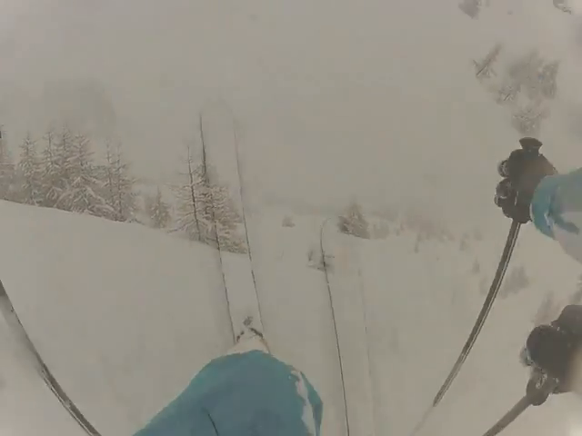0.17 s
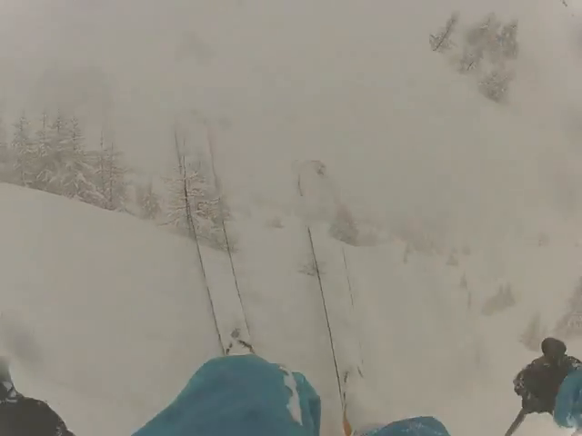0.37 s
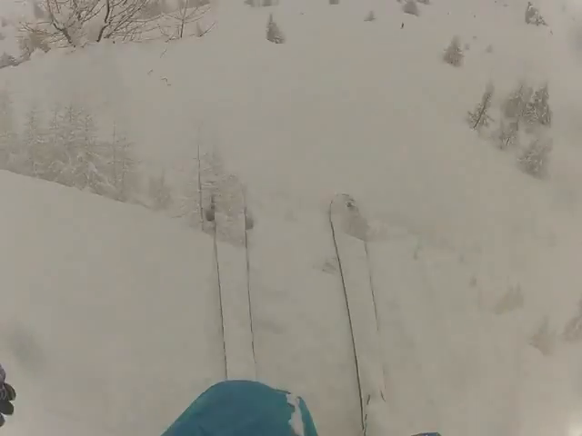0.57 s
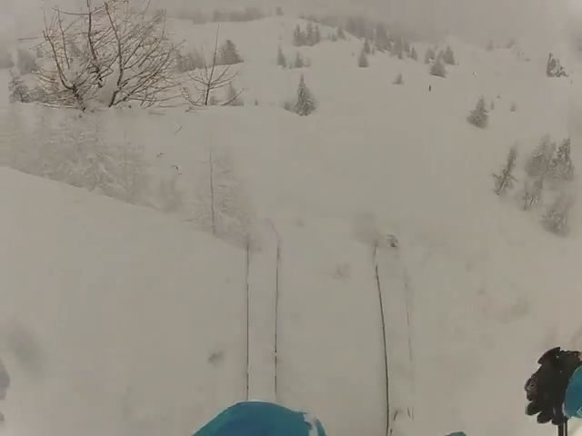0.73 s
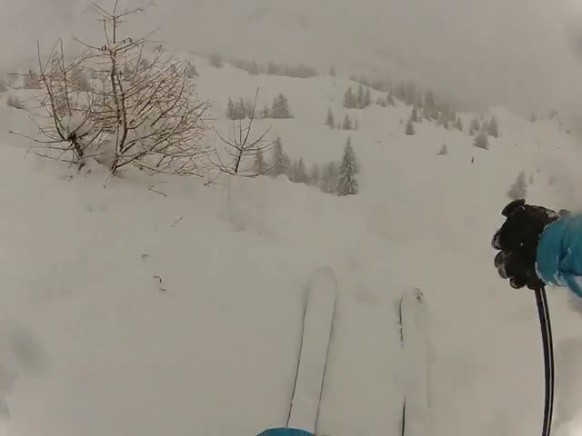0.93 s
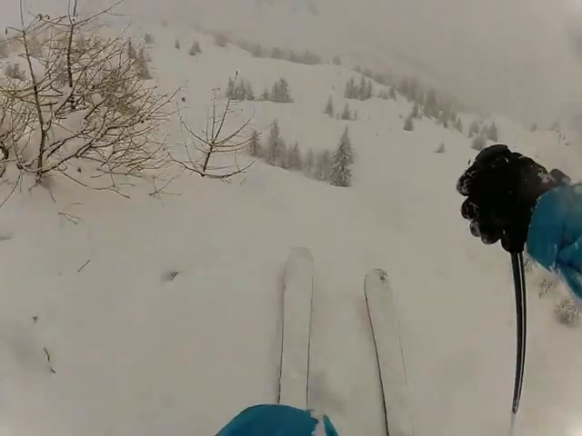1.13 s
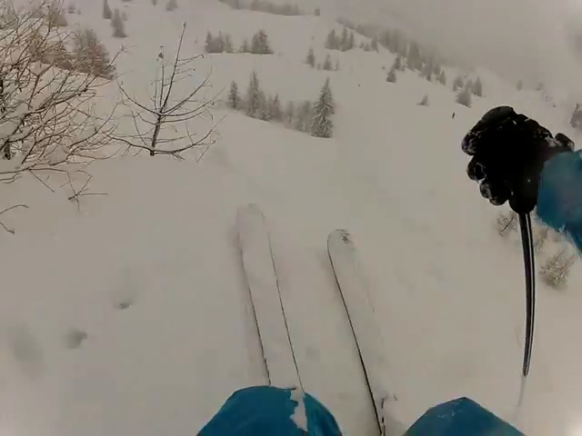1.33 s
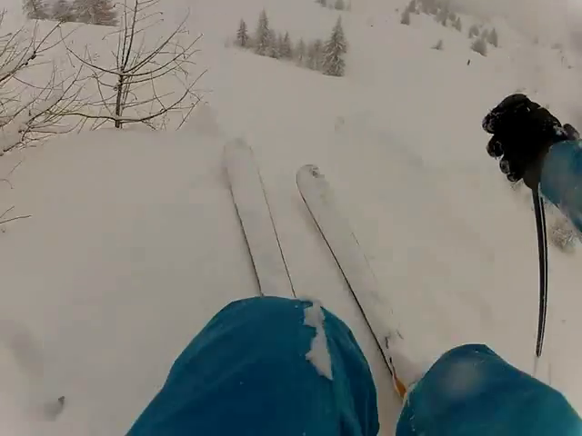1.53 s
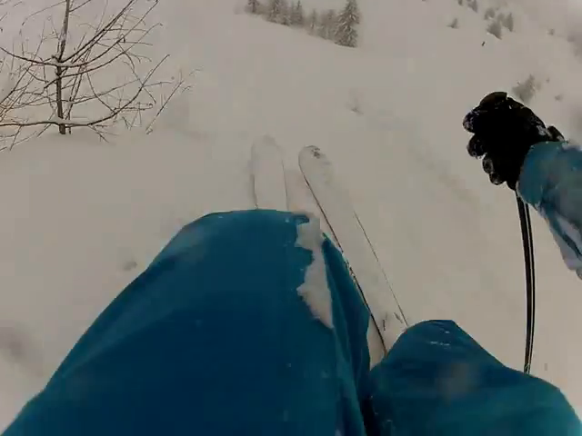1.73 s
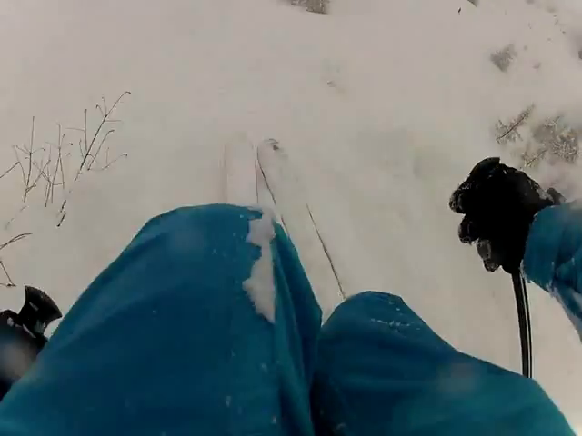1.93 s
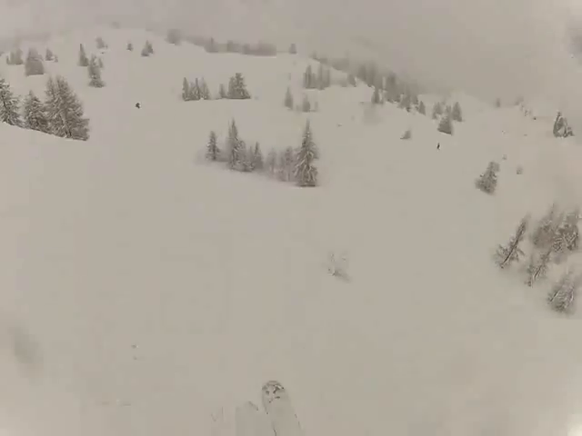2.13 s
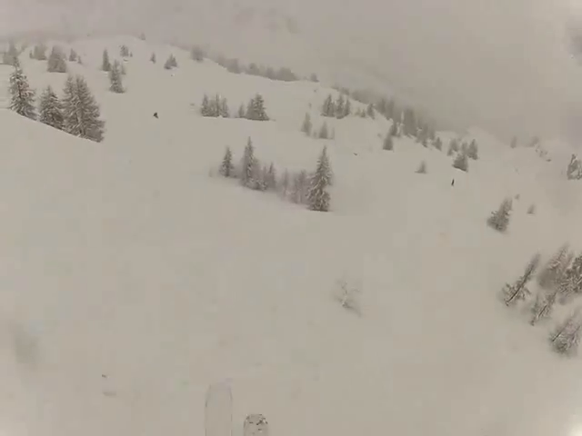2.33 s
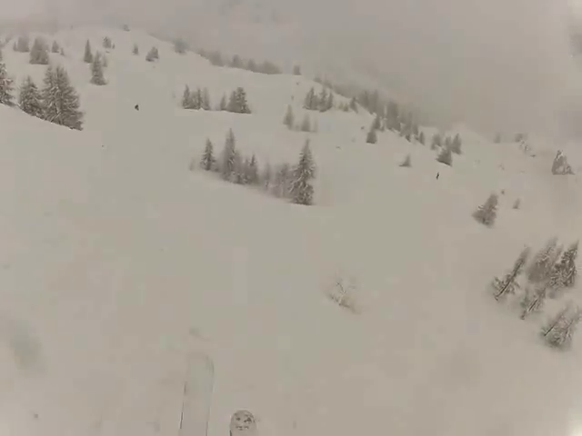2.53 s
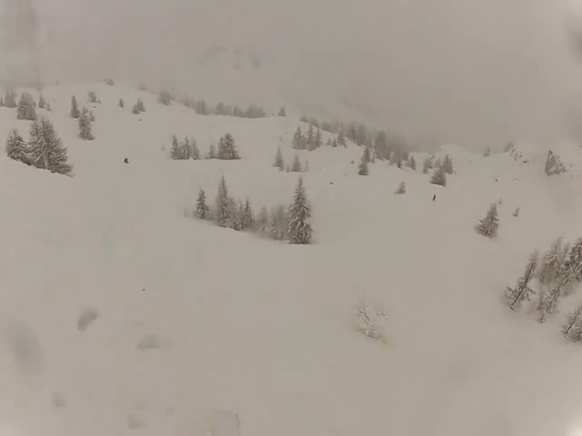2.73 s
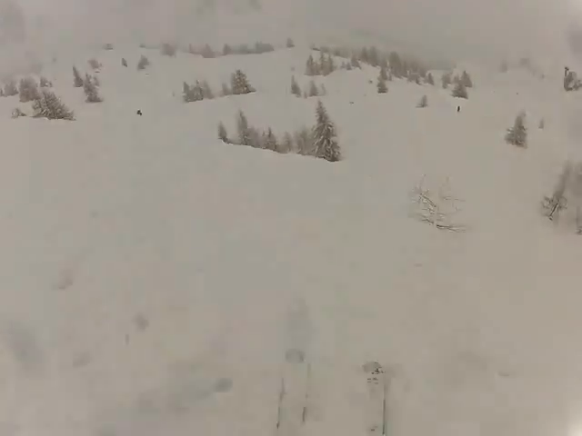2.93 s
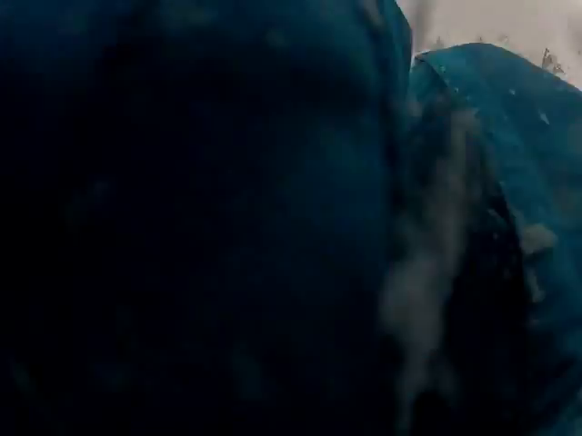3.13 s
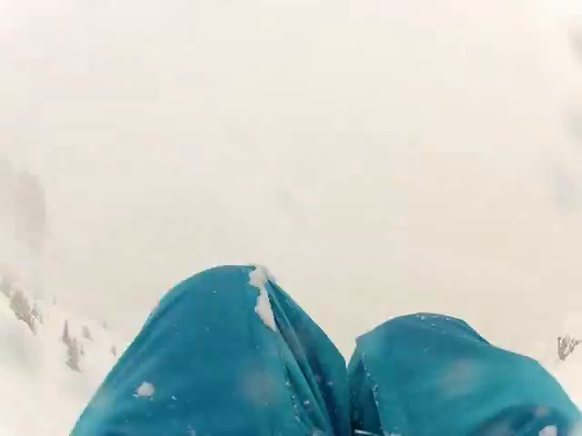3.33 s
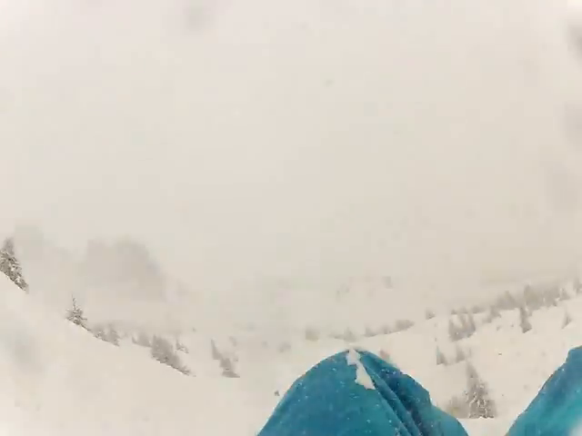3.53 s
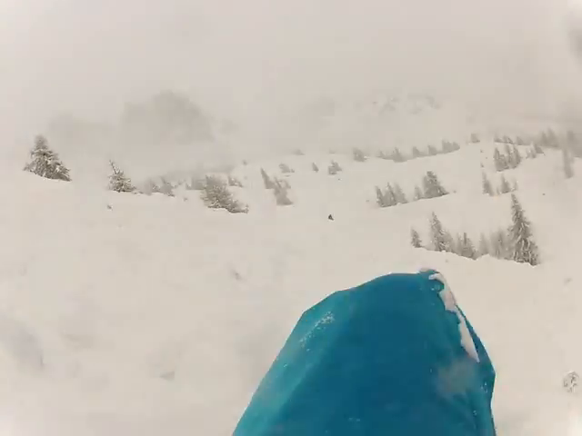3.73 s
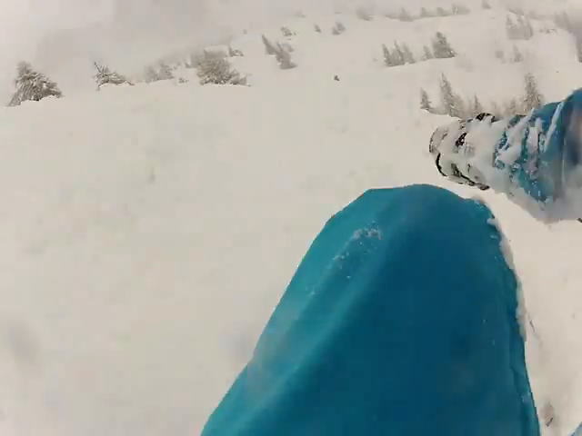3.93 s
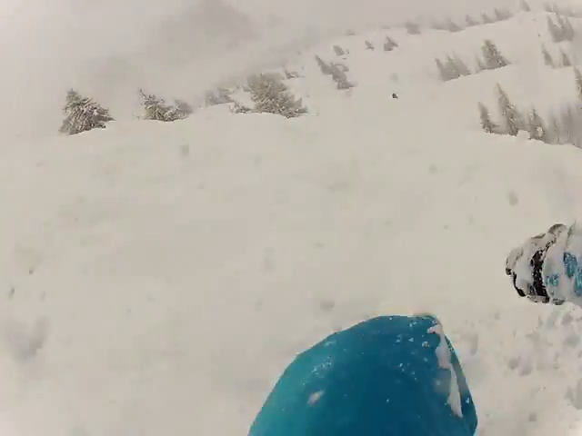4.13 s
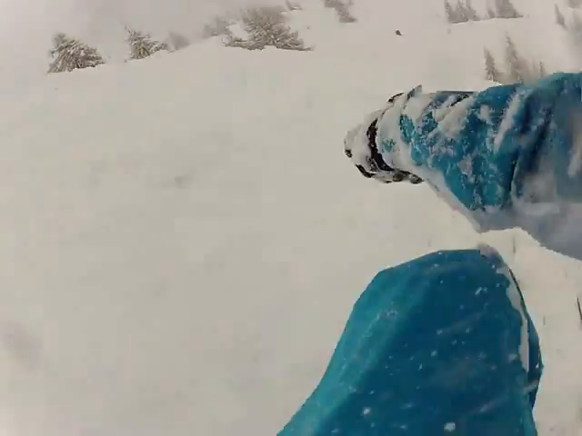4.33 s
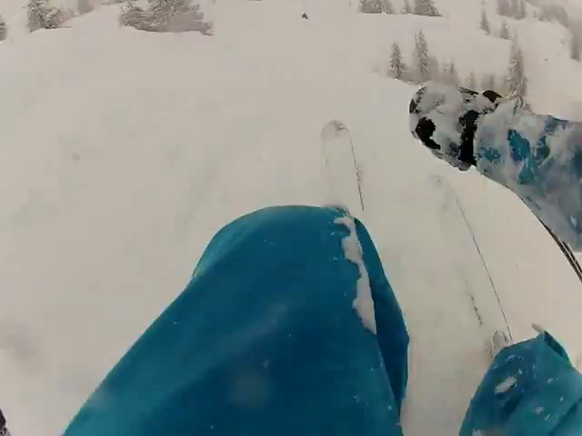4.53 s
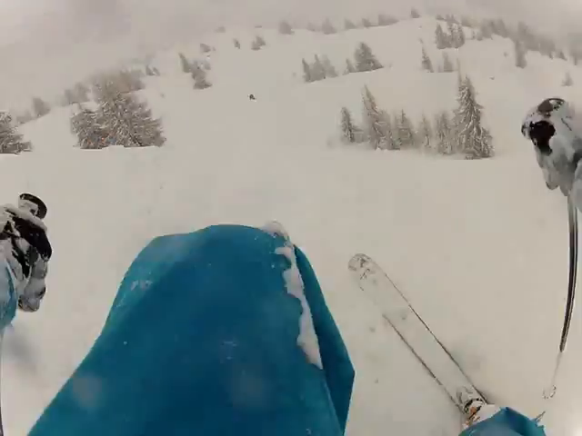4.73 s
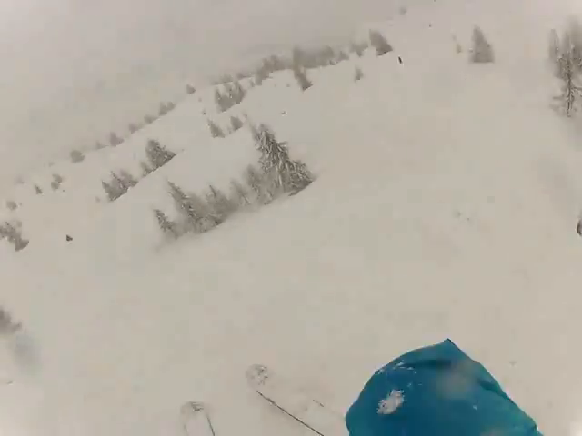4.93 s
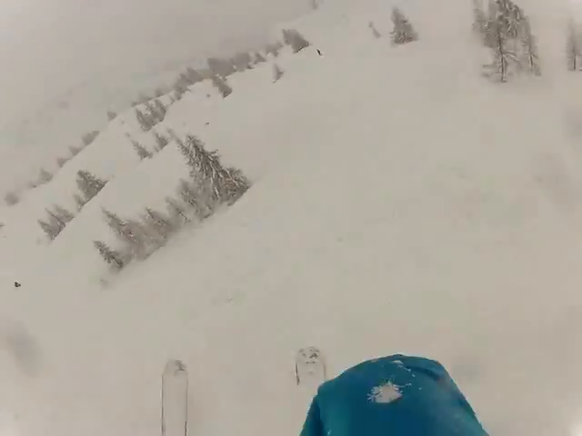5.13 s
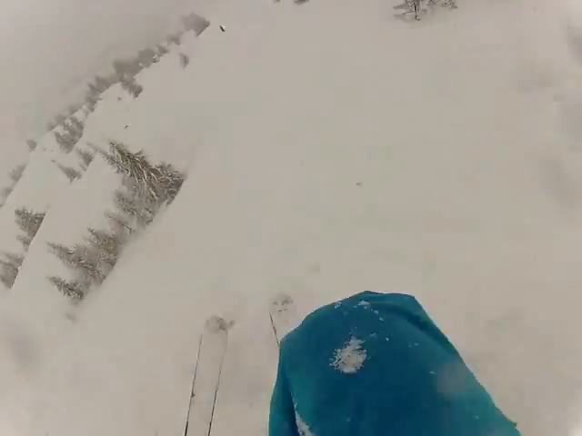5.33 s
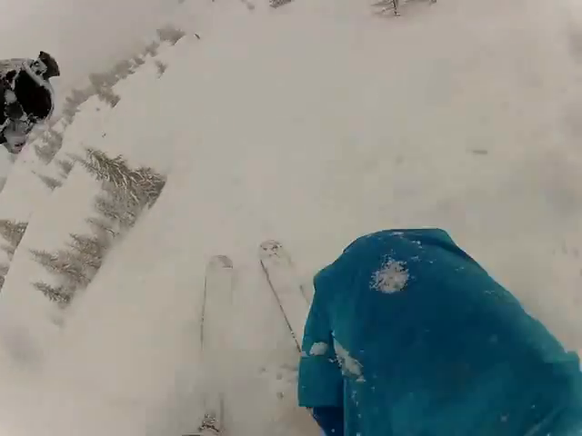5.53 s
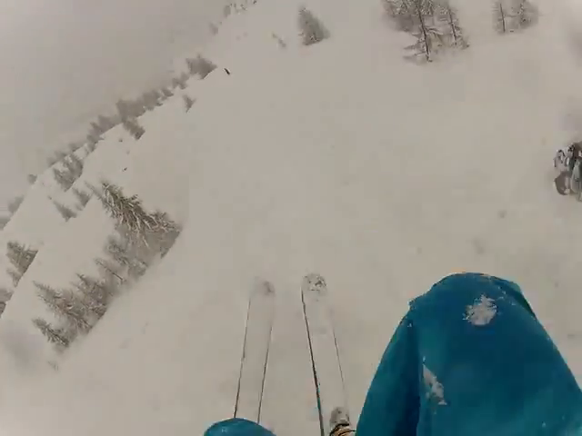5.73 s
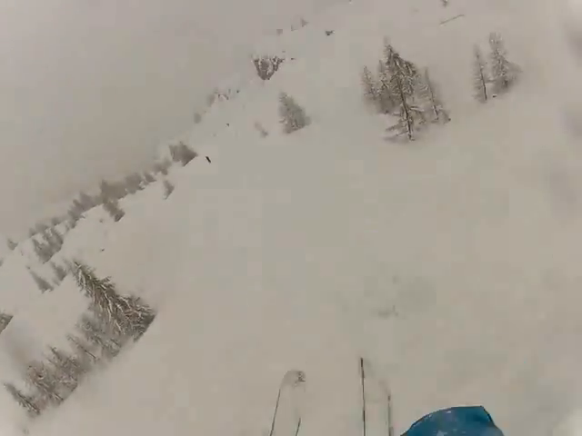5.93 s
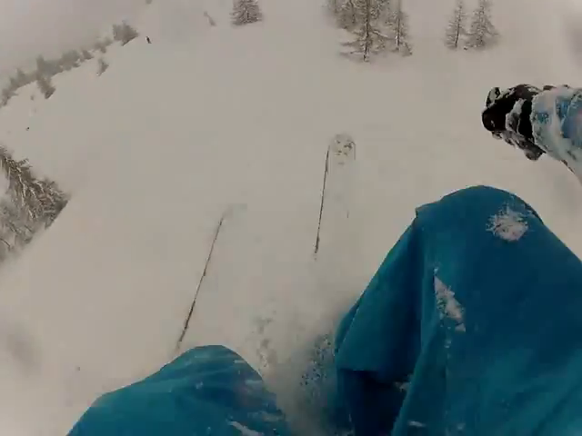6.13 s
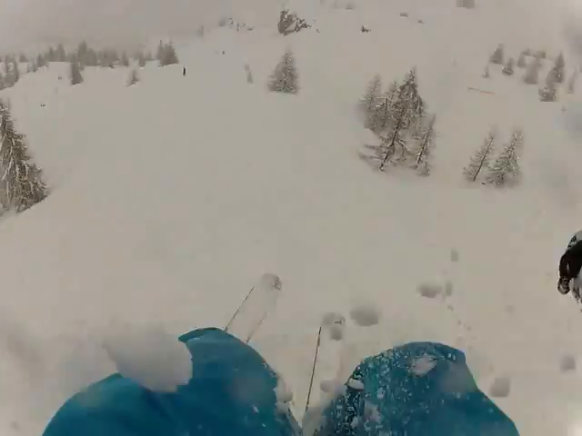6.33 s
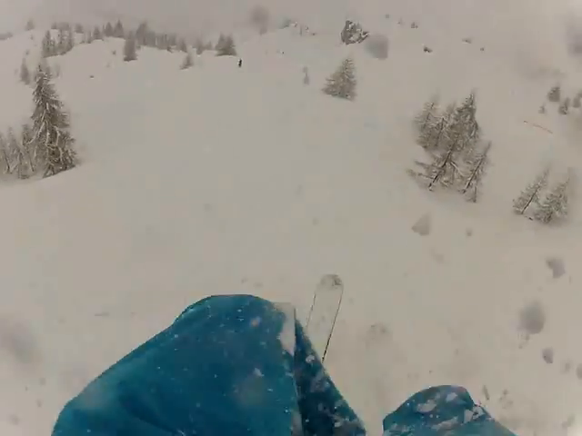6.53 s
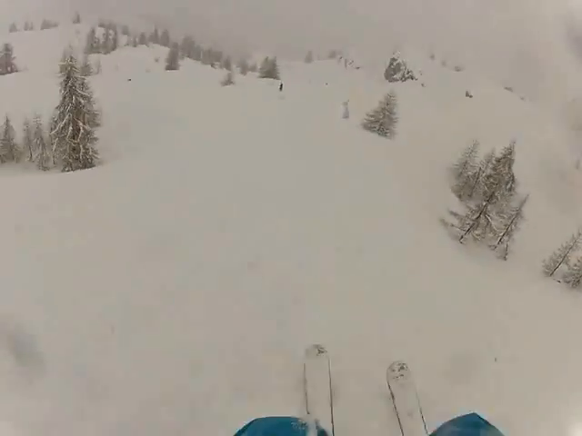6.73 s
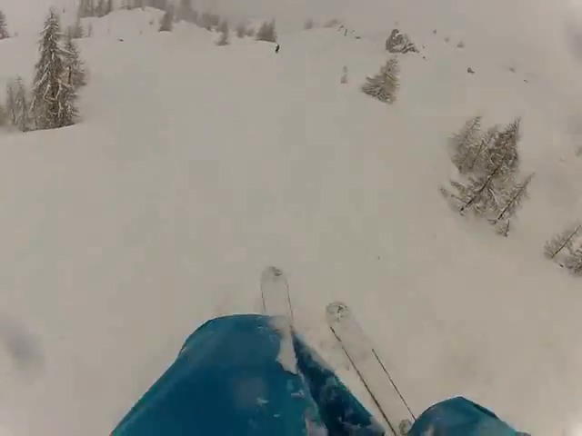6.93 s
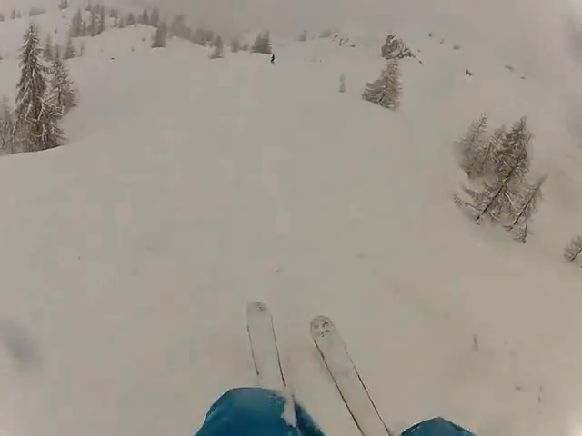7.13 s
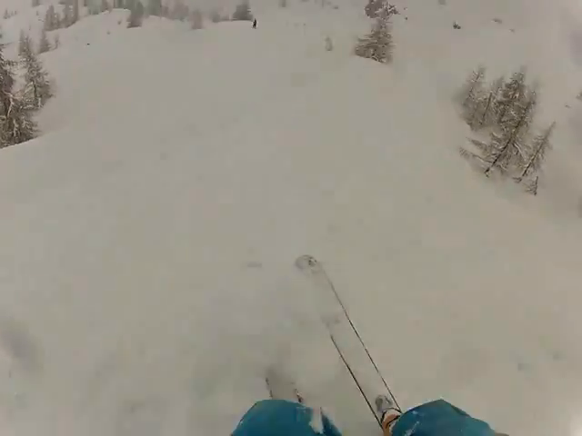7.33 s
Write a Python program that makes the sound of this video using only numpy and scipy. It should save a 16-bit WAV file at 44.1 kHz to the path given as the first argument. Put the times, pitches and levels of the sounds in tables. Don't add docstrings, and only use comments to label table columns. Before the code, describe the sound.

The microphone sits in a sealed housing strapped to a skier's chest, so everything is close, boxy and dull, with a gritty bright edge. From 0 to 2 seconds it is very quiet: low wind lumps, faint rubbing of cloth and snow, tiny dry ticks and hollow strap taps. At 2.2 a few soft thumps, a short crunch and a dry crack, then a near hush with faint raps. From 3.05 to 3.35 the landing is by far the loudest moment: deep booming thuds, crushed snow, dense crackle and spray, peaks distorting. A smaller thud and crunch rebound at 3.5. Raps and scrapes follow, with a sharp pole clack at 4.06 and fizzing powder until 4.7. Snow surges and a knock come around 5.0; at 5.7 a rattling jolt with a loud knock. Lighter scrapes, thumps and ticks continue, fading by 7.3.

```python
import sys
import numpy as np
from scipy import signal
from scipy.fft import rfft, irfft, next_fast_len
from scipy.io import wavfile
from scipy.ndimage import uniform_filter1d

SR = 44100
rng = np.random.default_rng(int(sys.argv[2]) if len(sys.argv) > 2 else 0)


def dump(signal):
    limited = np.clip(np.atleast_2d(signal).T, -1, 1)
    pcm = np.round(limited * 32767).astype(np.int16)
    wavfile.write(sys.argv[1], SR, pcm)


def gain_from_db(level_db):
    decades = np.asarray(level_db, float) / 20
    return 10 ** decades


N = 325017
CLOCK_HZ = 12000

# time_s, body_motion_db (in the strap), rubbing_db (steady, on the shell)
RIDE = [(0, -60, -58.5), (.7, -55, -55.5), (1.2, -61, -60), (1.75, -54, -54.5), (2.25, -44.5, -40.5),
        (2.65, -58.5, -59.5), (2.85, -50.5, -55), (2.97, -40, -42.5), (3.2, -41.5, -38.5),
        (3.55, -35, -34.5), (3.69, -44, -46.5), (3.92, -46.5, -48), (4.62, -39.5, -40),
        (4.86, -51.5, -50.5), (5.42, -50, -49), (5.91, -52, -52), (6.24, -44.5, -43), (7, -55, -52)]


def evened(x):
    return x / np.sqrt(np.mean(x ** 2) + 1e-20)


def read(points, hz):
    f, value = np.transpose(points)
    return np.interp(np.log(hz + 1), np.log(f + 1), value)


def add(mix, s, sound):
    part = mix[round(s * SR):][:len(sound)]
    part += sound[:len(part)]


def control(table, column):
    rows = np.array(table)
    return gain_from_db(np.interp(np.arange(N) / SR, rows[:, 0], rows[:, column]))


def causal(db_of_hz, size=8192):
    hz = abs(np.fft.fftfreq(size, 1 / SR))
    log_gain = np.log(gain_from_db(np.maximum(db_of_hz(hz), -100)))
    phase = -signal.hilbert(log_gain).imag
    return np.fft.ifft(np.exp(log_gain + 1j * phase)).real[:size // 2]


def through(x, colour, lo_hz, hi_hz):
    y = signal.oaconvolve(x, colour)[:N]
    band = signal.sosfilt(signal.butter(4, [lo_hz, hi_hz], "band", fs=SR, output="sos"), y)
    return y / np.sqrt(np.mean(band ** 2))


def flicker(seconds, depth_db):
    span = max(round(seconds * SR), 1)
    wander = uniform_filter1d(uniform_filter1d(rng.standard_normal(N), span), span)
    return gain_from_db(depth_db * evened(wander))


def grit(per_s, spread_db, share):
    size = gain_from_db(spread_db * np.minimum(rng.exponential(1, N), 3.5))
    happens = rng.random(N) < per_s / SR
    clicks = rng.standard_normal(N) * size * happens
    return evened(rng.standard_normal(N) + share * evened(clicks))


def patchy(x, depth_db):
    z = signal.stft(x, nperseg=256, noverlap=192)[2]
    patches = uniform_filter1d(rng.standard_normal(z.shape), 3, axis=0)
    patches = evened(uniform_filter1d(patches, 5, axis=1))
    return evened(signal.istft(z * gain_from_db(depth_db * patches), nperseg=256, noverlap=192)[1][:N])


def bell(t, width):
    return np.exp(-.5 * (t / np.where(t < 0, width, 0.74 * width)) ** 2)


def strike(t, width):
    rise = np.exp(-.5 * (t / (0.93 * width)) ** 2)
    decay = np.exp(-np.maximum(t, 0) / (0.86 * width))
    return np.where(t < 0, rise, decay)


def shell_db(hz):
    # centre_hz, width_hz, level_db
    modes = [(634, 174, -7), (1180, 300, 1.5), (1760, 1100, -3.5), (2170, 280, -3.5), (3580, 400, -4)]
    # frequency_hz, level_db
    wall = [(300, -23), (500, -12), (800, -8.5), (1100, -12), (2600, -8), (3900, -22), (4400, -29),
            (5800, -24.5)]
    power = gain_from_db(read(wall, hz)) ** 2 * (hz < CLOCK_HZ / 2)
    for f, width, db in modes:
        power = power + gain_from_db(db) ** 2 / (1 + (2 * (hz - f) / width) ** 2) ** 2
    return 10 * np.log10(power + 1e-12)


def pressure():
    # centre_s, level_db, length_ms
    surges = [(0.186, -53.5, 34), (.556, -51.5, 49), (.862, -50.5, 11), (1.4, -57.5, 71), (1.5, -49, 55),
              (1.976, -48, 71), (2.064, -46, 16), (2.283, -41, 55), (2.548, -50, 20), (3.802, -31.5, 15),
              (3.914, -45, 40), (3.976, -36, 29), (4.184, -52, 81), (4.405, -34, 13), (4.954, -43, 54),
              (5.064, -42, 49), (5.147, -41.5, 23), (5.483, -39.5, 71), (5.575, -39, 28),
              (5.688, -27.5, 32), (5.762, -32, 47), (5.94, -38.5, 42), (6.13, -36.5, 35), (6.275, -40, 10),
              (6.493, -38, 14), (6.649, -34, 42), (6.919, -46, 13), (7.05, -41, 43), (7.123, -41, 16),
              (7.3, -74.5, 36)]
    # centre_s, level_db, length_ms
    plunge = [(2.972, -47, 8.3), (3.071, -24.5, 24.4), (3.117, -20.5, 21.6), (3.194, -14.5, 38.4),
              (3.26, -23.5, 45), (3.31, -21, 24), (3.042, -36, 8), (3.416, -29, 18), (3.47, -34.5, 90),
              (3.526, -18, 11), (3.587, -32.5, 37)]
    power, t = control(RIDE, 2) ** 2, np.arange(N) / SR
    for s, db, ms in surges + plunge:
        near = slice(max(round((s - .2) * SR), 0), round((s + .2) * SR))
        half_s = np.clip(0.87 * ms, 4, 60) / 1000
        plateau = np.exp(-abs((t[near] - s) / half_s) ** 1.9)
        power[near] += (gain_from_db(db) * plateau) ** 2
    return np.sqrt(power)


def rumble():
    # time_s, level_db
    wind = [(0, -66), (.76, -54), (1.25, -72), (1.42, -48), (1.58, -63), (2.13, -48), (2.36, -48),
            (2.65, -56.5), (3.22, -25.5), (3.39, -33.5), (3.6, -25), (3.82, -42), (4.33, -39),
            (4.72, -34.5), (4.86, -55), (5.7, -40), (5.95, -44), (7.37, -54)]
    # frequency_hz, level_db
    sway_colour = [(8.8, -16), (15, 0.5), (39, -3.5), (76, -13), (120, -16), (160, -28), (260, -120)]
    shake_colour = [(41, -21), (70, -0.5), (146, -1.5), (200, -6.5), (272, -7.5), (318, -12.5),
                    (428, -23.5), (529, -38.5), (642, -25), (700, -28.5), (910, -46), (1540, -120)]
    air_colour = [(200, -27), (280, -6.5), (450, -5.5), (700, -15), (1000, -63)]
    sway = rng.standard_normal(N) * flicker(0.078, depth_db=4.5)
    sway = through(sway, causal(lambda hz: read(sway_colour, hz), size=32768), 20, 85)
    shake = rng.standard_normal(N) * flicker(0.011, depth_db=4.0)
    shake = through(shake, causal(lambda hz: read(shake_colour, hz)), 85, 350)
    air = through(rng.standard_normal(N), causal(lambda hz: read(air_colour, hz)), 250, 700)
    pushed = (pressure() / control(RIDE, 2)) ** 0.75
    out = gain_from_db(-1.5) * control(wind, 1) * sway
    out += gain_from_db(2.0) * control(RIDE, 1) * pushed * shake
    return out + gain_from_db(-68.5) * air


def rubbing():
    slips = grit(per_s=1100, spread_db=2.5, share=0.46)
    slips = slips * flicker(0.0013, depth_db=1.5) * flicker(0.037, depth_db=1.0)
    return gain_from_db(-3.0) * pressure() * through(patchy(slips, depth_db=3.0), causal(shell_db), 440, 5800)


def whine():
    # frequency_hz, rms_db
    tones = [(5039, -84), (5087, -86.5)]
    t, out = np.arange(N) / SR, np.zeros(N)
    for hz, db in tones:
        out += np.sqrt(2) * gain_from_db(db) * np.sin(2 * np.pi * (hz * t + rng.random()))
    return out


def thrown():
    # start_s, level_db, length_s
    plumes = [(0.8, -62, 0.055), (1.924, -51.5, 0.043), (2.877, -50.5, 0.1), (3.056, -43, 0.11),
              (3.164, -25.5, 0.036), (3.663, -49, 0.059), (3.728, -44.5, 0.27), (3.87, -54, 0.12),
              (4.109, -40, 0.28), (4.372, -42, 0.094), (4.46, -51, 0.19), (4.668, -46.5, 0.059),
              (5.48, -54.5, 0.37), (6.13, -61.5, 0.54), (.838, -60, .03), (6.378, -46, 0.13),
              (6.45, -52, .1), (6.57, -48.5, 0.19), (6.88, -65, 0.18), (7.09, -47.5, 0.041),
              (7.206, -56, 0.041)]
    rise_s, sag_db, fall_db_per_s = 0.039, -6, -250
    dust = gain_from_db(-30.5) * pressure() ** 0.78
    power, t = dust ** 2, np.arange(SR) / SR
    for s, db, length in plumes:
        fade_db = sag_db * t / length + fall_db_per_s * np.maximum(t - length, 0)
        add(power, s, (np.minimum(t / rise_s, 1) * gain_from_db(db + fade_db)) ** 2)
    return np.sqrt(power)


def spray():
    # frequency_hz, level_db
    spray_colour = [(350, -20), (600, -14), (815, -6), (1110, -5), (1530, -9), (2100, 1), (2750, -3),
                    (3490, 0.5), (4100, -9.5), (4870, -4), (5900, -11.5), (7670, -16), (13000, -120)]
    fizz = grit(per_s=1500, spread_db=1.5, share=0.77) * flicker(0.032, depth_db=1.76)
    colour = causal(lambda hz: read(spray_colour, np.minimum(hz, 5500)))
    return gain_from_db(-2.5) * thrown() * through(patchy(fizz, depth_db=2.5), colour, 4150, 5980)


def ticks():
    # time_s, peak_db, centre_hz, length_ms
    knocks = [(.081, -40, 2000, 1), (.5739, -42, 1720, 3.7), (.6972, -32.5, 1400, 4.8),
              (.818, -41.5, 1275, 3), (.9789, -38.5, 1520, 2.3), (1.418, -51, 1490, 2.3),
              (1.867, -37, 1770, 1.1), (1.388, -43, 890, 1.6), (3.4995, -18.5, 1800, 3.1),
              (3.6122, -23.5, 1560, 3.2), (3.6402, -24.5, 2010, 2.5), (4.4968, -21, 1150, 1.3),
              (5.0628, -19, 1870, 3.3), (5.4607, -30, 1450, 1.5), (5.6136, -29.5, 1040, 0.69),
              (5.684, -21, 1600, 1.3), (5.7173, -8, 1760, 0.9), (5.7405, -17, 1490, 3.1),
              (6.413, -37, 786, 1.8), (6.5418, -27, 1970, 4.9), (6.9988, -33.5, 1850, 1.5),
              (7.0468, -25, 1850, 1.9)]
    cracks = [(.5516, -33.5, 1460, 1.7), (.5945, -36, 1500, 1.5), (.865, -32.5, 1500, 2.3),
              (1.7827, -42, 2460, 1.4), (1.9732, -28.5, 2000, 1.2), (2.0594, -28.5, 1420, 1.3),
              (2.1114, -30, 2240, 2.3), (2.2758, -15, 1790, 1.2), (2.2895, -24.5, 2250, 0.73),
              (2.4896, -35.5, 1410, 4.8), (2.9703, -24, 1370, 1.1), (3.1662, -7.5, 2050, 1.7),
              (3.1917, -9, 2100, 6), (3.2147, -7.5, 2230, 1.5), (3.2637, -7.5, 2000, 0.8),
              (3.3085, -8, 1720, 11), (3.5135, -13, 1880, 1), (3.534, -12.5, 2310, 7.2),
              (4.978, -32, 2000, 1.6), (4.6256, -28, 2040, 2.5), (6.054, -27, 1840, 4.1),
              (6.6114, -22.5, 2280, 2.5), (6.7852, -30, 2100, 2), (6.8185, -28, 2520, 2),
              (6.9232, -30, 1520, 2), (7.0265, -35, 2410, 2.2), (7.0649, -22.5, 2080, 0.77),
              (7.23, -33.5, 2870, 0.68)]
    raps = [
        (2.7216, -38.5, 2530, 2.8),
        (2.7682, -36, 2010, 1.8),
        (2.7736, -29.5, 2140, 1.3),
        (2.8521, -30, 1760, 0.89),
        (3.8224, -20, 1950, 4.6),
        (3.9158, -27, 1030, 4.7),
        (3.9976, -20.5, 1800, 2.6),
        (4.132, -27, 1450, 5.6),
        (6.6403, -26, 2220, 2.9),
        (7.1611, -30.5, 2500, 0.59),
    ]
    pellets = [(.6407, -44.5, 3470, 1.1), (.7509, -48.5, 4800, 0.91), (2.541, -43, 3400, 1.6),
               (2.952, -42, 5200, 1.5), (4.0638, -16, 4700, 3.8), (4.069, -18, 5350, 1.4),
               (4.0813, -27.5, 4760, 2.5), (4.1076, -29, 3800, 1.6), (4.3722, -29, 4600, 0.75),
               (5.408, -44, 4500, 1.5), (5.7869, -42, 4900, 1.5), (6.2127, -44, 4900, 1.2),
               (6.4241, -30, 5030, 2.1), (6.5326, -33.5, 3800, 2.1), (6.8642, -21, 3800, .9),
               (7.3028, -40, 3340, 2.4), (4.0654, -19, 2320, 1.6)]
    taps = [(.531, -42, 1700, 2), (.689, -40, 1800, 2.4), (.729, -44, 1300, 2), (.743, -43, 2000, 1.5),
            (.856, -38, 1500, 2.5), (1.301, -48, 1310, 2), (1.363, -46, 1700, 2), (1.579, -43, 2200, 2.2),
            (1.625, -43, 1210, 1.6), (1.678, -45, 1180, 2), (1.791, -37, 1700, 1.5),
            (3.054, -23, 1170, 2.5), (3.402, -34, 1240, 2.8), (3.414, -28, 1200, 4),
            (3.483, -27, 1990, 1.8), (3.56, -29, 1230, 2), (3.588, -29, 1300, 3.7), (3.797, -32.5, 980, 4),
            (3.943, -36, 1130, 3), (3.971, -33, 1000, 3), (4.153, -28.5, 1220, 2), (4.298, -34, 1090, 1.7),
            (4.389, -27.5, 1500, 2.2), (4.98, -33, 1090, 3), (5.077, -33, 790, 3), (5.112, -41, 1000, 2),
            (5.221, -49, 1500, 2), (5.403, -32.5, 1190, 2), (5.925, -30, 1270, 2),
            (6.119, -26.5, 1180, 4.1), (6.272, -34, 990, 3), (6.47, -29, 1500, 2.5),
            (6.501, -30.5, 1180, 2.7), (6.727, -34, 1210, 1.8), (6.826, -34, 1600, 2)]
    snaps = [(.561, -47, 3300, 1.5), (.847, -44, 2800, 2), (.935, -47, 2400, 2), (1.815, -51, 4800, 1.3),
             (1.937, -34, 2230, 1.5), (2.02, -46, 3600, 1.4), (3.042, -28, 2070, 1.5), (3.08, -25, 3600, 2),
             (3.088, -22, 3600, 2), (3.152, -19, 1850, 1.7), (3.18, -12, 2200, 8), (3.297, -12.5, 2000, 5),
             (3.525, -14.5, 2600, 4.3), (3.5335, -12, 3580, 1.4), (3.756, -33.5, 3030, 2.2),
             (3.806, -29, 3100, 2), (4.0655, -17, 2960, 3.6), (4.325, -31, 3020, 1.5),
             (4.409, -25.5, 3380, 1.8), (5.56, -36, 2210, 1.7), (5.881, -32, 2060, 2.2),
             (5.917, -42, 4900, 2), (6.064, -40, 3500, 1.5), (6.291, -33, 2600, 1.2),
             (6.579, -32, 2240, 1.4), (6.605, -33, 2090, 2), (6.802, -34, 2000, 1.5),
             (6.84, -37, 2400, 1.8), (6.906, -37.5, 3540, 2), (7.034, -36, 2600, 1.3),
             (7.087, -43, 4800, 1.5), (7.127, -33, 2800, 2.2), (7.148, -40, 3000, 2),
             (7.156, -29.5, 3500, 1.8), (7.268, -40, 3230, 1.5)]
    # blows, bright edge dB (at 1945 Hz), dull body dB, loose grains dB
    kinds = [(knocks, -21, -5, -22), (cracks, -18.5, -23, -19.5), (raps, -13.5, -7.5, -32),
             (pellets, -18, -36, -47), (taps, -17, -6.5, -26), (snaps, -29, -29, -24)]

    def bandpass(order, lo_hz, hi_hz):
        return signal.butter(order, [lo_hz, hi_hz], "band", fs=SR, output="sos")

    out, t = np.zeros(N), np.arange(-700, 900) / SR
    shell = causal(shell_db)[:900] * np.exp(-np.arange(900) / SR / 0.029)
    edge, hollow, upper = bandpass(3, 4100, 6400), bandpass(2, 400, 1350), bandpass(2, 3200, 3950)
    for blows, edge_db, dull_db, crumbs_db in kinds:
        for s, db, hz, ms in blows:
            bright_db = edge_db + 15 * np.log2(hz / 1945)
            crumbs = gain_from_db(crumbs_db) * bell(t - .0003, 0.006)
            hit = strike(t + 0.00033, np.clip(0.35 * ms, .3, 5) / 1000)
            crackle = rng.standard_normal(len(t)) * (hit + crumbs)
            centre = signal.sosfilt(bandpass(3, hz / 1.59, hz * 2.07), crackle)
            ringing = signal.oaconvolve(centre + gain_from_db(-14) * crackle, shell)
            parts = [(ringing, .3),
                     (signal.sosfilt(edge, crackle), bright_db + 3.0),
                     (signal.sosfilt(hollow, crackle), dull_db + 0.5),
                     (signal.sosfilt(upper, crackle), -12.0)]
            for part, rel_db in parts:
                add(out, s + t[0] - .0006, gain_from_db(db + rel_db) * part / abs(part).max())
    return out


def thumps():
    # time_s, peak_db, frequency_hz, length_ms
    jolts = [(.53, -34, 155, 5.3), (1.231, -42, 139, 20), (1.498, -33.5, 125, 9.5),
             (1.586, -36.5, 145, 9.2), (2.154, -27, 124, 9.6), (2.174, -31, 140, 5.2),
             (2.212, -25, 121, 5.3), (2.229, -27.5, 145, 4.6), (2.496, -30.5, 194, 4.5),
             (2.553, -31.5, 122, 12), (4.066, -27.5, 184, 4.9), (4.152, -22.5, 107, 13),
             (4.238, -19.5, 179, 4.5), (4.411, -29, 144, 17), (5.463, -20.5, 169, 5.2),
             (5.678, -20.5, 163, 4.1), (5.695, -17.5, 119, 13), (5.718, -22.5, 196, 4.6),
             (5.755, -20.5, 134, 36), (6.149, -24.5, 180, 5), (6.16, -28, 122, 12), (6.655, -40, 150, 6),
             (6.679, -26, 206, 7.8), (6.692, -22.5, 182, 5.3), (7.037, -27.5, 119, 6),
             (7.049, -23.5, 265, 11.4), (.982, -43, 230, 5.2), (.747, -43, 150, 7.5),
             (3.417, -16.5, 138, 8), (3.443, -19, 150, 8.6), (3.455, -17, 169, 7), (3.473, -18, 160, 5.4)]
    # time_s, peak_db, frequency_hz, length_ms
    landing = [(3.056, -6.5, 161, 4.8), (3.096, -14, 146, 4.8), (3.116, -5, 126, 15.5),
               (3.141, -8.5, 130, 6.3), (3.158, 3.5, 135, 7.6), (3.19, -7, 162, 4.2),
               (3.201, -7.5, 114, 7.1), (3.215, -4.5, 103, 8.4), (3.503, -10, 101, 5.3),
               (3.562, -18, 124, 8.8), (3.615, -24.5, 169, 16)]
    # time_s, peak_db, frequency_hz
    heaves = [(1.618, -38, 63.6), (2.353, -31.5, 42.8), (2.72, -39, 45.7), (3.213, -3.5, 48.3),
              (3.228, -12.5, 32), (3.53, -19, 31), (3.51, -15.5, 46.5), (3.565, -21, 40),
              (3.623, -20, 40.8), (5.107, -31, 63.6), (5.699, -24, 65), (5.748, -19.5, 65),
              (7.075, -30.5, 37)]
    out, t = np.zeros(N), np.arange(-3000, 4000) / SR
    heaved = [(s, db, hz, 1.44 / hz * 1000) for s, db, hz in heaves]
    for s, db, hz, ms in jolts + landing + heaved:
        swing = np.sin(2 * np.pi * (hz * t + rng.random()))
        swing = swing * bell(t, np.clip(0.41 * ms, 2.5, 18) / 1000)
        add(out, s + t[0], gain_from_db(db - 0.5) * (swing - swing.mean()))
    return out


def clang():
    # frequency_hz, level_db, t60_s
    pole_modes = [(1980, 2, 0.012), (2570, 0.5, 0.011), (3208, -8, 0.017), (3410, 2, 0.012),
                  (4160, -19, 0.018), (5040, -19, 0.044)]
    # frequency_hz, level_db, t60_s
    knee_modes = [(1211, -17, 0.61), (1723, 0, 0.025), (2153, -8, 0.036), (2929, -14, 0.023),
                  (3698, -21, 0.18)]
    out, t = np.zeros(N), np.arange(2000) / SR
    # time s, peak dB, modes, rise s
    for s, peak_db, modes, rise_s in (3.3065, -7, knee_modes, .003), (4.063, -5, pole_modes, .0012):
        ring = np.zeros(len(t))
        for hz, db, t60 in modes:
            ring += gain_from_db(db - 60 * t / np.clip(t60, .008, .04)) * np.sin(2 * np.pi * hz * t)
        ring = ring * np.minimum(t / rise_s, 1)
        add(out, s, gain_from_db(peak_db) * ring / abs(ring).max())
    return out


def scene():
    return (rumble() + rubbing() + whine() + spray() + ticks() + thumps() + clang())[None]


def mirrored(dry):
    # frequency_hz, below_clock_db, change_above_clock_db
    images = [(40, -54, -4), (150, -35.5, 4), (450, -26, -2), (992, -20, -1), (2000, -13.5, -2.5),
              (3270, -8.5, -4), (3450, -7.5, -60), (4500, -4.5, -80), (5850, -0.5, -80)]
    size = next_fast_len(N)
    hz, spectrum = np.fft.rfftfreq(size, 1 / SR), rfft(dry, size)
    half = CLOCK_HZ / 2
    spectrum = spectrum * np.clip((half - hz) / 550 + 0.11, 0, 1) * (hz < half)
    f, below_db, change_db = np.transpose(images)

    def image(db):
        return signal.hilbert(irfft(spectrum * gain_from_db(read(np.c_[f, db], hz)), size))[:, :N]

    clock = np.exp(2j * np.pi * CLOCK_HZ * np.arange(N) / SR)
    below = (clock * image(below_db).conj()).real
    above = (clock * image(below_db + change_db)).real
    return irfft(spectrum, size)[:, :N] + below + above


def gated(x):
    hz, _, z = signal.stft(x, SR, nperseg=1024, noverlap=768)
    bands = rng.standard_normal((z.shape[-1], len(hz) // 8 + 1))
    bands = uniform_filter1d(bands, size=7, axis=0)
    muted = bands < np.quantile(bands, .3)
    muted = np.repeat(muted, 8, axis=1)[:, :len(hz)].T
    muted = muted & ((hz > 11050) & (hz < 12900))[:, None]
    return signal.istft(z * np.where(muted, 0., 1.), SR, nperseg=1024, noverlap=768)[1][:, :N]


def top_cut(x):
    return signal.sosfilt(signal.butter(12, 16030, fs=SR, output="sos"), x)


def record(dry):
    wet = mirrored(dry)
    dip = bell(np.arange(N) / SR - 7.341, 0.0025)
    wet = wet * gain_from_db(-20 * dip)
    mix = gated(np.clip(wet, -.99, .99))
    return top_cut(mix)


dry = scene()
out = record(dry)
dump(out)
```